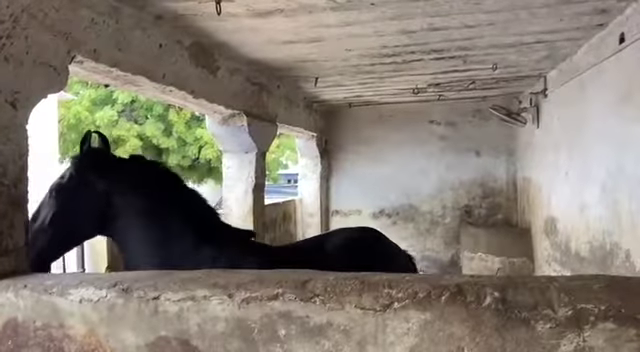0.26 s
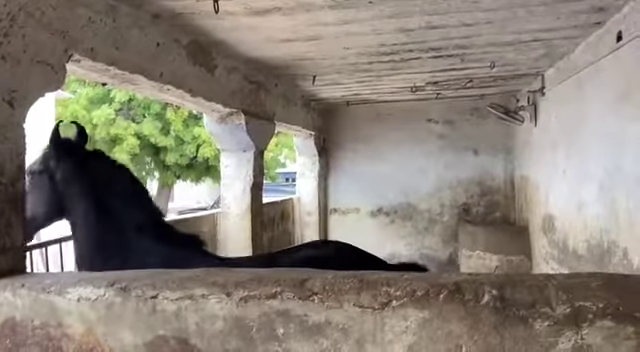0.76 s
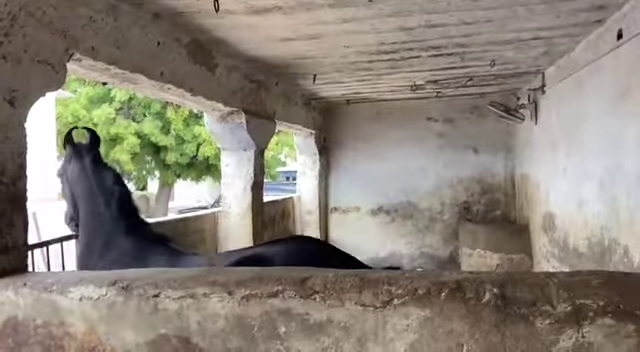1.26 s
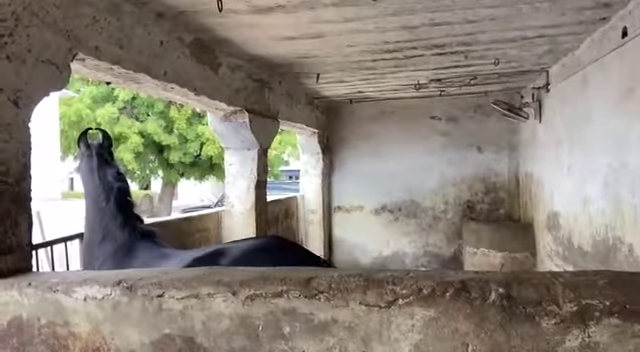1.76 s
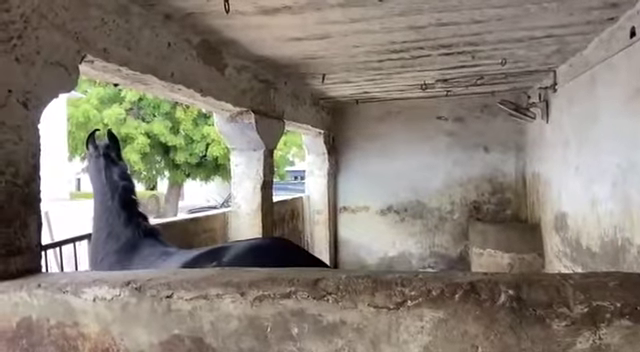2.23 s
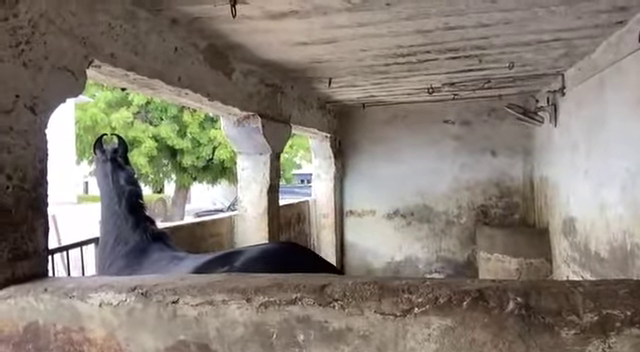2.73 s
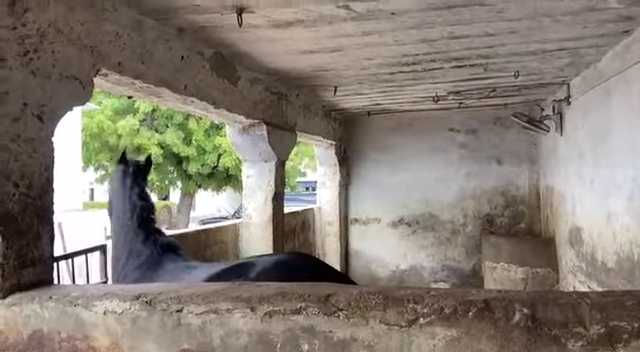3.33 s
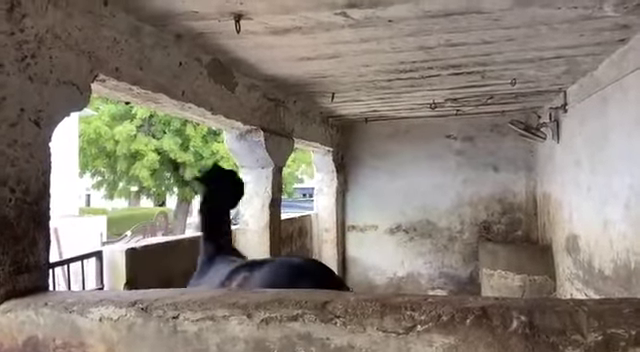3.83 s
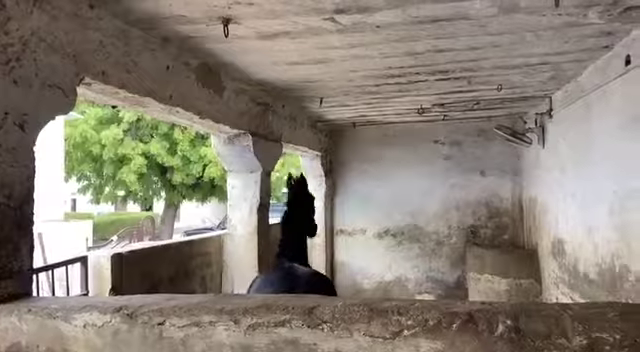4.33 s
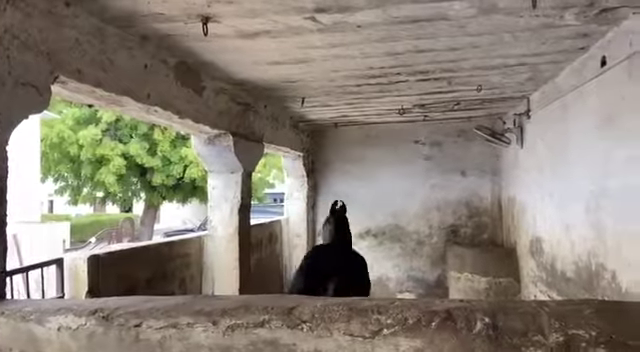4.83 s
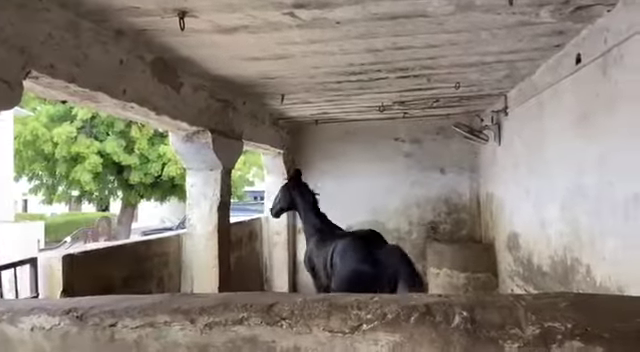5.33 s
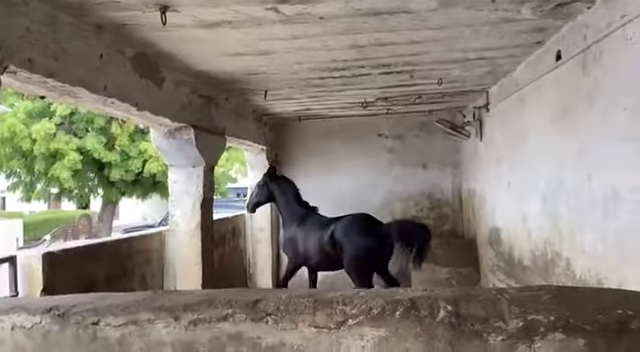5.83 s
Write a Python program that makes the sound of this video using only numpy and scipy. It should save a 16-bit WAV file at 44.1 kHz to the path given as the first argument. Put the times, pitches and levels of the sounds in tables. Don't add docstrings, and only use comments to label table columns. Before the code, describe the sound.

In an open stall, hooves scuff and thud on concrete while a hammer strikes across the yard, crows caw and small birds whistle.

```python
import sys
import numpy as np
from scipy import signal
from scipy.fft import rfft, irfft, next_fast_len
from scipy.io import wavfile

SR = 44100
rng = np.random.default_rng(int(sys.argv[2]) if len(sys.argv) > 2 else 0)


def volts_from_decibels(level):
    exponent = np.asarray(level, float) / 20
    return 10 ** exponent


def digitize_waveform(pressure):
    field = np.atleast_2d(pressure).T
    bounded = np.clip(field, -1, 1)
    quanta = np.round(bounded * 32767).astype(np.int16)
    wavfile.write(sys.argv[1], SR, quanta)


N = 268510
TIME = np.arange(N) / SR
CUTOFF_HZ = 11800


def rms_one(x):
    return x / np.sqrt(np.mean(x ** 2) + 1e-20)


def at_hz(points, hz):
    table_hz, values = np.transpose(points)
    return np.interp(np.log(hz + 1), np.log(table_hz), values)


def colour(x, spectrum):
    count = x.shape[-1]
    size = next_fast_len(count)
    gain = volts_from_decibels(at_hz(spectrum, np.fft.rfftfreq(size, 1 / SR)))
    return irfft(rfft(x, size) * gain, size)[..., :count]


# hz, likeness (0 to 1)
MICROPHONE_LIKENESS = [(40, 0.97), (150, 0.96), (300, 0.81), (600, 0.2), (1200, 0.072), (2500, 0.52),
                       (5000, 0.81), (9000, 0.94)]


def stereo_noise(count):
    size = next_fast_len(count)
    alike = np.clip(at_hz(MICROPHONE_LIKENESS, np.fft.rfftfreq(size, 1 / SR)), 0, 1)
    mid, side = rfft(rng.standard_normal((2, size)))
    left_right = np.sqrt(1 + alike) * mid + np.sqrt(1 - alike) * side * [[1], [-1]]
    return irfft(left_right, size)[:, :count] / np.sqrt(2)


def flicker(rate_hz, depth_db):
    points = rng.standard_normal(2000)
    return volts_from_decibels(depth_db * np.interp(TIME * rate_hz, np.arange(2000), points))


def resonate(x, peaks):
    out = 0
    for k, (hz, width_hz, db) in enumerate(peaks):
        r = np.exp(-np.pi * width_hz / SR)
        poles = [1, -2 * r * np.cos(2 * np.pi * hz / SR), r * r]
        ringing = signal.lfilter([1, 0, -1], poles, x) * (1 - r * r) / 2
        out = out + (-1) ** k * volts_from_decibels(db) * ringing
    return out


def space(x, t60s, build_s, wet_db):
    size = 2 ** 15
    t = np.arange(size) / SR
    edges = 30 * 2 ** np.arange(0, 9.1, 1 / 3)
    noise, hz = rfft(stereo_noise(size)), np.fft.rfftfreq(size, 1 / SR)
    tail = 0
    for low, high in zip(edges, edges[1:]):
        band = irfft(noise * ((hz >= low) & (hz < high)))
        tail = tail + band * volts_from_decibels(-60 * t / at_hz(t60s, np.sqrt(low * high)))
    tail = tail * (1 - np.exp(-t / build_s)) * volts_from_decibels(wet_db)
    return signal.fftconvolve(x[None], tail, axes=1)[:, :N]


def turn(x, phase, balance, top_hz):
    size = next_fast_len(N + 4096)
    hz = np.fft.rfftfreq(size, 1 / SR)
    half = np.exp(.5j * np.interp(hz, *np.transpose(phase))) * volts_from_decibels(at_hz(balance, hz) / 2)
    return irfft(rfft(x, size) * [half, 1 / half] * (hz < top_hz), size)[:, :N]


def efforts(s, hold_s, db, attack_s, sag_db, fall_db, rest_db):
    step = TIME[::32]
    t = np.maximum(step - s[:, None], 0)
    hold_s = hold_s[:, None]
    level = db[:, None] - sag_db * np.minimum(t, hold_s) - fall_db * np.maximum(t - hold_s, 0)
    power = np.sum((volts_from_decibels(level) * (1 - np.exp(-t / attack_s))) ** 2, axis=0) + volts_from_decibels(rest_db) ** 2
    return np.interp(TIME, step, np.sqrt(power))


# hz, level_db
AIR_SPECTRUM = [(15, -37), (25, -4.5), (66, 1), (160, -13.5), (279, -9), (339, -16.5), (605, -16.5),
                (934, -23.5), (3050, -34.5), (3280, -37), (5710, -48), (8000, -53.5), (10400, -48),
                (17600, -120)]


def far_air():
    air_db = -57
    return volts_from_decibels(air_db - 2.5) * rms_one(colour(stereo_noise(N), AIR_SPECTRUM)) * flicker(3, depth_db=1.5)


# start_s, hold_s, slab_boom_db, stall_thump_db, trough_knock_db
WEIGHT_SHIFTS = [(-.04, .13, -34, -61, -67), (0.317, 0.22, -48.5, -59, -72), (.49, 0.049, -40, -48.5, -55),
                 (0.542, 0.31, -34, -70, -66.5), (1.048, .04, -53, -75, -57.5),
                 (1.14, 0.69, -51.5, -65, -88), (2.724, 0.02, -55, -57, -58),
                 (2.825, 0.018, -44.5, -79, -79), (3.56, 0.048, -69, -59, -65),
                 (3.839, 0.05, -35, -47, -59), (3.935, 0.19, -40, -60, -81),
                 (4.097, 0.067, -40, -44, -46.5), (4.21, 0.24, -36, -43.5, -48),
                 (4.388, 0.046, -24, -25, -36.5), (4.449, 0.083, -31.5, -27.5, -41),
                 (4.566, 0.31, -34, -42.5, -58), (4.794, 0.099, -31, -30, -35.5),
                 (4.87, 0.058, -33, -38.5, -41.5), (4.932, 0.076, -39, -33, -32.5),
                 (5, 0.14, -35.5, -42.5, -54), (5.233, 0.033, -38, -34.5, -43.5),
                 (5.298, 0.63, -39, -48.5, -65.5), (5.726, 0.29, -47, -47, -60.5),
                 (6.048, 0.037, -46, -54, -52)]
# pitch_hz, width_hz, level_db
SLAB_MODES = [(45, 32.7, -7), (63.4, 11.86, 4.5), (75.2, 23.95, -3.5), (111.6, 27.3, -6.5)]
# pitch_hz, width_hz, level_db
STALL_MODES = [(133, 22.6, -4), (197.8, 24.3, -1), (250.5, 17.5, -4)]
# pitch_hz, width_hz, level_db
TROUGH_MODES = [(284.6, 64.5, 0), (373, 78, -1), (435, 21.8, 0.5), (500, 70.5, -7)]


def slab():
    s, hold_s, boom_db, thump_db, knock_db = np.transpose(WEIGHT_SHIFTS)
    attack_s, sag_db_per_s = 0.0096, 30
    boom = efforts(s, hold_s, boom_db, attack_s, sag_db_per_s, fall_db=129, rest_db=-61.5)
    thump = efforts(s, hold_s, thump_db, attack_s, sag_db_per_s, fall_db=158, rest_db=-61.5)
    knock = efforts(s, hold_s, knock_db, attack_s, sag_db_per_s, fall_db=204, rest_db=-69)
    slow_pushes = stereo_noise(N) * flicker(25, depth_db=-1.0)
    quick_pushes = stereo_noise(N) * flicker(45, depth_db=3.5)
    out = boom * rms_one(resonate(slow_pushes, SLAB_MODES))
    out += thump * rms_one(resonate(quick_pushes, STALL_MODES))
    out += knock * rms_one(resonate(quick_pushes, TROUGH_MODES))
    return volts_from_decibels(-1.5) * out


# start_s, length_s, scrape_db, sandiness_db
HOOF_SCUFFS = [(0.045, .02, -66.5, -34), (.31, 0.024, -71, -13), (0.39, .07, -73, -8),
               (0.467, 0.06, -67, -7), (0.741, 0.034, -61.5, -4.5), (0.797, 0.035, -77, -6),
               (1.39, 0.08, -80, 0.5), (1.547, 0.042, -76, 2.4), (1.76, 0.083, -83, -2),
               (1.98, 0.11, -69, -14), (2.203, 0.11, -67, -21), (3.51, 0.12, -66.5, -38),
               (3.56, .02, -68, -23), (3.632, 0.17, -68, -30), (3.823, 0.043, -68, -7.5),
               (3.93, 0.068, -66, -9), (4.014, 0.065, -60.5, -6), (4.059, 0.21, -49.5, -9),
               (4.3, 0.16, -56, -14), (4.399, 0.015, -40.5, -10), (4.547, 0.045, -63.5, -4),
               (4.734, 0.056, -56, -16), (4.796, 0.07, -58.5, -6), (4.922, 0.12, -59.5, -14.5),
               (5.115, 0.025, -69.5, -1.5), (5.208, 0.062, -55, -9), (5.32, 0.14, -64, -11.5),
               (5.535, 0.064, -62.5, -10), (5.599, 0.15, -66.5, -4.5), (6.032, 0.069, -64.5, -4)]
# hz, level_db
SCRAPE_SPECTRUM = [(250, 5), (500, 7.5), (850, 1), (1500, 2.5), (2500, -9), (4000, -36.5), (6000, -33)]
# hz, level_db
GRIT_SPECTRUM = [(1500, 1.5), (3000, 13.5), (5000, 4.5), (7000, -4.5), (9000, -27), (11500, -63)]
# hz, level_db
DUST_SPECTRUM = [(5000, -17), (7500, -12.5), (9000, -8.5), (11500, -14)]
# pitch_hz, width_hz, level_db
HORN_MODES = [(850, 180, 0), (1300, 300, -10)]


def drag():
    s, length_s, db, sandy_db = np.transpose(HOOF_SCUFFS)
    attack_s, sag_db_per_s, fall_db_per_s = 0.12 * length_s[:, None], 32.5, 245

    def scuffs(level_db, rest_db):
        return efforts(s, length_s, level_db, attack_s, sag_db_per_s, fall_db_per_s, rest_db)

    scrape = scuffs(db, -85)
    grit = scuffs(db + sandy_db, -98)
    dust = scuffs(db + 2.2 * sandy_db, -100)
    rough = rms_one(colour(stereo_noise(N) * flicker(150, depth_db=2.5), SCRAPE_SPECTRUM))
    horn_db = db + 3 + 90 * (length_s - .19)
    held = efforts(s, length_s, horn_db, .02, 90, fall_db_per_s, -120)
    out = held * rms_one(resonate(rough * flicker(70, depth_db=1.5), HORN_MODES))
    sand = stereo_noise(N) * flicker(150, depth_db=1.5)
    out += volts_from_decibels(4.0) * scrape * rough
    out += volts_from_decibels(-2.0) * grit * rms_one(colour(sand, GRIT_SPECTRUM))
    out += volts_from_decibels(8.5) * dust * rms_one(colour(sand, DUST_SPECTRUM))
    return out


# start_s, length_s, first_pitch_hz, last_pitch_hz, level_db
BIRD_WHISTLES = [
    (0.158, 0.37, 2950, 2867, -73),
    (0.18, 0.44, 2380, 2490, -74),
    (1.896, 0.2, 3330, 4460, -80),
    (5.403, 0.54, 2776, 2770, -75.5),
]


def small_birds():
    out = np.zeros(N)
    warble, flutter = flicker(200, depth_db=.7), flicker(40, depth_db=3.5)
    for s, length_s, first_hz, last_hz, db in BIRD_WHISTLES:
        u = np.clip((TIME - s) / length_s, 0, 1)
        glide_hz = last_hz - first_hz
        warbling = np.clip(3.7 * abs(glide_hz) / 300, .1, .8)
        pitch_hz = (first_hz + glide_hz * u) * warble ** warbling
        swell = np.abs(np.sin(np.pi * u)) ** 0.24
        out += volts_from_decibels(db) * swell * np.sin(2 * np.pi * np.cumsum(pitch_hz) / SR)
    return out * flutter


# start_s, thud_db, thud_pitch_hz, clack_db (relative to thud), clack_pitch_hz
HOOF_FALLS = [(0.258, -34.5, 62, -29, 634), (0.479, -33, 97, -40, 657), (0.526, -31.5, 84, -49, 816),
              (1.406, -40.5, 75.3, -12, 790), (2.829, -43, 60.6, -7, 1120), (3.008, -49, 109, -24, 630),
              (3.23, -48.5, 232, -9.5, 734), (3.564, -56.5, 61, 9.5, 680), (3.862, -29, 64.7, -20.5, 950),
              (4.401, -17.5, 96, -12, 500), (4.578, -19, 96.6, -33, 600), (4.743, -24, 62, -17.5, 1250),
              (4.805, -25, 169, -16.5, 675), (4.838, -19, 436, -23, 654), (4.841, -23.5, 74.2, -15.5, 694),
              (4.929, -18, 373, -36, 700), (4.98, -23.5, 315, -41, 600), (5.035, -27, 284, -45, 595),
              (5.117, -46, 85, -40, 620), (5.236, -23.5, 226, -46, 607), (5.229, -33, 100, -11, 726),
              (5.52, -32.5, 60, -7, 1150), (5.748, -57, 76.4, -32, 620), (6.065, -38.5, 147, -11, 2060)]
# hz, level_db
CLACK_SPECTRUM = [(200, 9), (500, -0.5), (1000, -8.5), (2000, -8), (3500, -14.5), (6000, -52), (11500, -32)]
# hz, t60_s
STALL_DECAY = [(60, 1), (200, 0.74), (600, 0.31), (2000, 0.62), (8000, 0.16)]


def hooves():
    thuds, clacks = np.zeros(N + 4096), np.zeros(N + 4096)
    t = np.arange(4096) / SR
    shape = (1 - np.exp(-t / .002)) * np.exp(-t / .016)
    for s, db, hz, clack_db, clack_hz in HOOF_FALLS:
        at = round(s * SR)
        push = np.sin(2 * np.pi * hz * t) * (1 - np.exp(-t * hz / 0.62)) * np.exp(-t * hz / 2.42)
        thuds[at:at + 4096] += volts_from_decibels(db - 3.5) * push
        burst = rng.standard_normal(4096) * shape
        horn = .6 * burst + resonate(burst, [(clack_hz, 400, 20)])
        clacks[at:at + 4096] += volts_from_decibels(db + clack_db - 6) * horn
    near = thuds[:N] + colour(clacks[:N], CLACK_SPECTRUM) * volts_from_decibels(2.5)
    return near + space(near, STALL_DECAY, 0.0031, wet_db=-31.5)


# start_s, peak_db, handle_db (relative), ring_db (relative)
HAMMER_BLOWS = [
    (0.6134, -29.5, -10.5, -19),
    (0.9859, -29, -4.5, -25),
    (2.286, -26.5, -28, -9.5),
    (2.653, -32, -6, -5),
]
# pitch_hz, level_db, t60_s
HEAD_MODES = [(834, 0.5, 0.42), (1039, 19, 0.3), (2660, 9, 0.15), (2800, 10, 0.15), (3100, 6, .25),
              (4010, 3, .4), (4505, 7, 0.2), (4950, 18, 0.6)]
# hz, level_db
BLOW_SPECTRUM = [(500, -21), (820, 7.5), (1100, 14), (1500, 1.5), (2800, 9.5), (3700, 5.5), (4600, 9),
                 (5600, 3), (8000, -3.5), (11500, -11.5)]
# hz, level_db
SLAP_SPECTRUM = [(1500, -38), (2600, -6), (3600, 14), (4700, 18), (6500, -35), (11500, -36)]
# hz, t60_s
YARD_DECAY = [(500, 0.3), (1100, 1), (2500, 0.74), (5000, 0.59), (8000, 0.51), (11500, 0.34)]


def hammer():
    slaps, early, strike = np.zeros(N), np.zeros((2, N)), np.zeros((2, N))
    t = np.arange(4096) / SR
    burst = (1 - np.exp(-(t / 0.012) ** 0.78)) * np.exp(-t / 0.02)
    scatter = rng.normal(0, 1, (len(HAMMER_BLOWS), 5))
    echoes = stereo_noise(N)
    for (s, db, handle_db, ring_db), chance in zip(HAMMER_BLOWS, scatter):
        at = round(s * SR)
        for k, slap_db in enumerate([-12, -4, -2, -4, -9]):
            delay_s = .0025 + .0045 * k + .0003 * chance[k]
            slaps[at + round(delay_s * SR)] = volts_from_decibels(db + slap_db + 1.5 * chance[k])
        early[:, at:at + 4096] = volts_from_decibels(db - 10.5) * echoes[:, at:at + 4096] * burst
        strike[:, at + 90] = volts_from_decibels(db + np.array([handle_db, ring_db]))
    ring = volts_from_decibels(31) * resonate(strike[0], [(1016, 103, 0)])
    for hz, db, t60_s in HEAD_MODES:
        r, w = volts_from_decibels(-60 / (t60_s * SR)), 2 * np.pi * hz / SR
        poles = [1, -2 * r * np.cos(w), r * r]
        ring += signal.lfilter([0, volts_from_decibels(db - 37) * np.sin(w)], poles, strike[1] + 1e-18)
    early = colour(early, BLOW_SPECTRUM)
    out = early + volts_from_decibels(-5.0) * colour(slaps, SLAP_SPECTRUM) + ring
    sent = early[0] + volts_from_decibels(-8) * ring
    starts = [round(row[0] * SR) for row in HAMMER_BLOWS]
    for at, end in zip(starts, starts[1:] + [N]):
        tail = space(sent[at:end], YARD_DECAY, 0.0022, wet_db=-30.5)[:, :N - at]
        out[:, at:at + tail.shape[1]] += tail
    return out


# start_s, length_s, highest_pitch_hz, level_db, upper_partials_db
CROW_CAWS = [
    (1.943, 0.12, 435, -69.5, 3.5),
    (1.96, 0.34, 577, -60.5, -0.5),
    (3.273, 0.31, 576, -49.5, -12),
    (3.605, 0.13, 600, -62, -1),
    (5.049, 0.193, 581, -58.5, 1.5),
    (5.832, 0.27, 550, -46.5, 0.5),
]
# hz, level_db
BEAK_SPECTRUM = [(650, -40), (1050, -13), (1400, -5), (1650, 0), (1950, -7), (2200, -8), (2550, -16),
                 (3200, -50)]


def crows():
    out = np.zeros(N)
    breath = rng.standard_normal(N)
    rattle_hz = 84
    rattle = 2 * np.pi * np.cumsum(rattle_hz * flicker(20, depth_db=.25)) / SR
    shake, waver = 1 + .085 * np.sin(rattle), flicker(160, depth_db=.55)
    for s, length_s, top_hz, db, upper_db in CROW_CAWS:
        last_hz = top_hz * (1 - np.clip(.013 * (db + 63), 0, .145))
        hoarse = np.clip(.03 * (-39 - db), .1, 1)
        span = slice(round(s * SR), round((s + length_s) * SR))
        u = np.clip((TIME[span] - s) / length_s, 0, 1)
        arch_hz = [.9 * top_hz, top_hz, .65 * top_hz + .35 * last_hz, last_hz]
        pitch_hz = np.interp(u, [0, .17, .55, 1], arch_hz)
        phase = 2 * np.pi * np.cumsum(pitch_hz * shake[span] * waver[span] ** hoarse) / SR
        tone = sum(np.sin(k * phase) * volts_from_decibels(upper_db * (k > 3)) for k in range(2, 6))
        tone += hoarse * 2.5 * breath[span]
        swell = np.clip(8.6 * u, 0, 1) * np.clip(2.34 * (1 - u), 0, 1)
        out[span] += volts_from_decibels(db) * tone * (1 + .5 * np.sin(rattle[span])) * swell
    return colour(out, BEAK_SPECTRUM)


# hz, left_lead_rad
BIRD_PHASE = [(600, 0), (1030, 1.9), (1460, 5.4), (1900, 7.8), (2070, 10.7), (2240, 11.7), (2700, 12.57)]
# hz, left_minus_right_db
BIRD_BALANCE = [(1100, 1), (1650, -3), (2300, 0)]


def scene():
    birds = small_birds() + crows()
    far_birds = space(birds, YARD_DECAY, .02, wet_db=-43)
    placed_birds = turn(birds, BIRD_PHASE, BIRD_BALANCE, CUTOFF_HZ)
    return far_air() + slab() + drag() + hooves() + hammer() + placed_birds + far_birds


def low_pass(x):
    return signal.sosfilt(signal.butter(12, 12290, fs=SR, output="sos"), x)


# hz, left_lead_rad
MICROPHONE_PHASE = [(0, 0), (430, -.1), (1030, -.9), (1460, -3.7), (2240, -6.3), (2930, -5.7), (3700, -6.2),
                    (7800, -6.4), (8350, -9.35), (9900, -9.5), (10400, -12.4), (11900, -12.6)]
# hz, left_minus_right_db
MICROPHONE_BALANCE = [(100, .6), (600, 1.5), (1300, -1.5), (2800, 1.5), (5000, 4), (9000, 0)]


def record(dry):
    ports = turn(dry, MICROPHONE_PHASE, MICROPHONE_BALANCE, CUTOFF_HZ)
    bass_cut = signal.butter(2, 35, "high", fs=SR, output="sos")
    mix = signal.sosfilt(bass_cut, ports)
    return low_pass(mix)


dry = scene()
out = record(dry)
digitize_waveform(out)
```